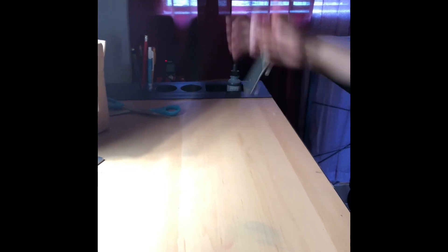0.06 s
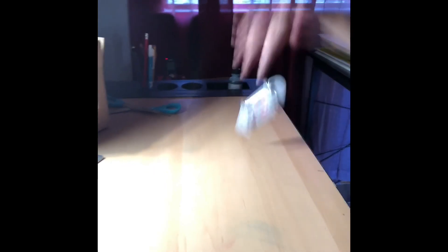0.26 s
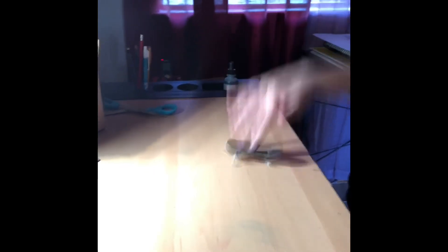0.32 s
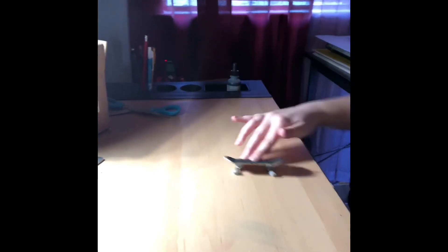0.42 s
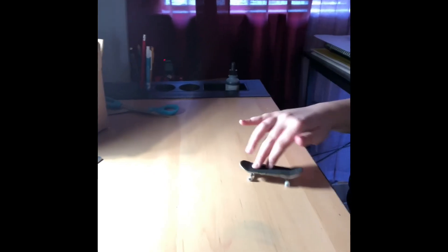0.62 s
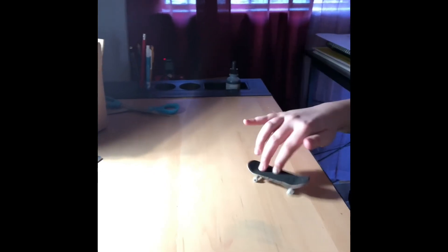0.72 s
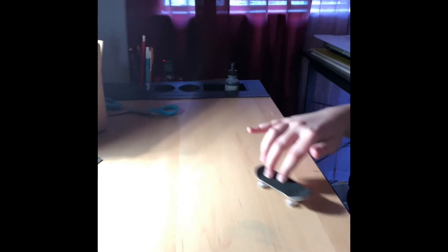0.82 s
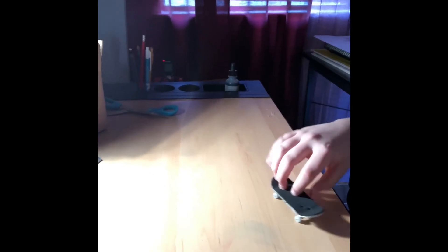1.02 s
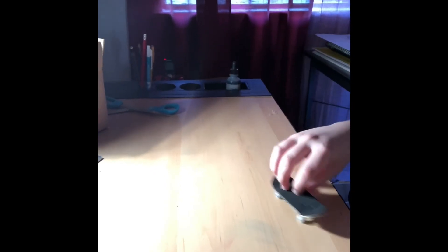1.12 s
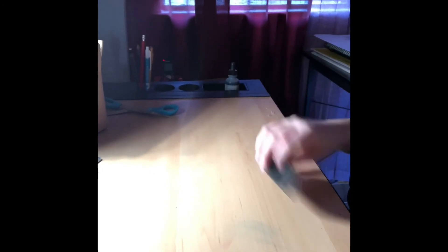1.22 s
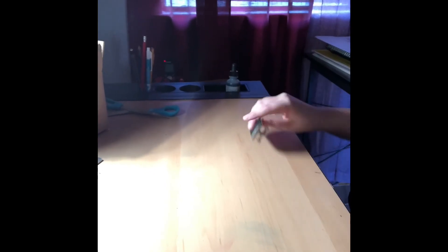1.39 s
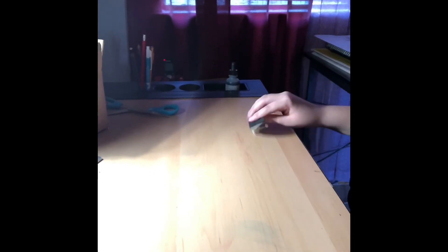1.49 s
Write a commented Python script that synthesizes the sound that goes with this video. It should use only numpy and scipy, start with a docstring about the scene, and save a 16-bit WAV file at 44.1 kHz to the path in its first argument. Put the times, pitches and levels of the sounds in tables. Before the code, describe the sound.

A toy finger skateboard on a wooden counter: the ringing tail of a flick fades at 0 s, then a loud, bright cluster of clacks and wheel rattle at 0.24-0.3 s, with short room reverb. Faint uneven rolling, scuffs and ticks follow from 0.4 to 1.13 s, then near quiet with low hum. Lighter clicks come at 1.4 s and a sharper clack at 1.52 s.

```python
"""Over room air and a low appliance hum, the flick of a toy skateboard off a wooden counter dies away.
The board clatters down wheels first, its loose wheels rattling, then rolls under two fingers,
is picked up and is set down again. Each contact is a noise burst that excites the modes of deck
and counter; rolling is a dense train of small bumps through resonances; a hard-walled kitchen
answers every contact and the rolling with a diffuse decay."""
import sys
import numpy as np
from scipy import signal
from scipy.fft import rfft, irfft
from scipy.io import wavfile

SR = 44100
rng = np.random.default_rng(int(sys.argv[2]) if len(sys.argv) > 2 else 0)


def volts(x):
    """Linear amplitude factor 10**(x/20) for a level x in dB, scalar or array-like."""
    e = np.asarray(x, float) / 20
    return 10 ** e


def persist_wave(psi):
    """Save psi, clipped to +-1, as 16-bit WAV."""
    counts = np.round(np.clip(psi, -1, 1) * 32767).astype(np.int16)
    wavfile.write(sys.argv[1], SR, np.atleast_2d(counts).T)


N = 68355
LEAD = int(.25 * SR)   # samples computed before t = 0, so that earlier sounds can ring on
M = N + LEAD


def rms_one(x):
    """Normalisation: scales a signal to unit rms."""
    return x / np.sqrt(np.mean(x ** 2) + 1e-20)


def resonance(x, hz, width_hz):
    """Damped oscillator: a two-pole band-pass with gain 1 near its peak."""
    r = np.exp(-np.pi * width_hz / SR)
    angle = 2 * np.pi * min(hz, .45 * SR) / SR
    return signal.lfilter(np.array([1, 0, -1]) * (1 - r * r) / 2, [1, -2 * r * np.cos(angle), r * r], x)


def double_resonance(x, hz, width_hz):
    """Cascade: two equal resonators in series give steeper skirts."""
    return resonance(resonance(x, hz, width_hz), hz, width_hz)


# Spectral density of the room air: f/Hz, relative level/dB per Hz
AIR = [(18, -41), (30, -13.5), (127, -3), (486, -13), (760, -20), (1630, -26.5), (2010, -25.5),
       (4080, -28.5), (4650, -28), (12600, -33.5), (16000, -44)]
# Bands of the appliance hum: f/Hz, width of each resonator/Hz, rms level/dB
HUM = [(53.54, 7.1, -81.5), (93.4, 5.5, -71), (120.9, 5.6, -67), (237.6, 3, -68.5)]
AIR_DB = -64   # rms


def background():
    """Filtered noise: shaped air, and narrow bands whose random beating makes the hum waver."""
    hz, db = np.transpose(AIR)
    log_f = np.log(np.fft.rfftfreq(M, 1 / SR) + 1)
    spectrum = rfft(rng.standard_normal(M)) * volts(np.interp(log_f, np.log(hz), db))
    air = irfft(spectrum, M)
    hum = 0
    for band_hz, width_hz, band_db in HUM:
        hum = hum + volts(band_db) * rms_one(double_resonance(rng.standard_normal(M), band_hz, width_hz))
    return volts(AIR_DB) * rms_one(air) + hum


def bursts(times, levels_db, rise_s, t60, colour):
    """Impact excitation: a sharp first contact in dying chatter, each coloured by its own filter."""
    size = 8000
    out, t = np.zeros(M + size), np.arange(size) / SR
    for k, noise in enumerate(rng.standard_normal((len(times), size))):
        burst = noise * np.minimum(t / rise_s, 1) * volts(-60 * t / t60)
        burst[int(rise_s * SR)] = volts(13)   # first contact, dB re the rms of the undecayed chatter
        burst = colour(burst, k)
        i = int(times[k] * SR) + LEAD
        out[i:i + size] += volts(levels_db[k]) * burst / np.abs(burst).max()
    return out[:M]


def cracks(s, db, hz, snap_db, t60, q):
    """Contact spectrum: each burst is coloured around its centre, with a broad bright snap."""
    def colour(x, k):
        body = double_resonance(x, hz[k], hz[k] / q)
        snap = resonance(x, 12000, 12000)
        return body + volts(snap_db[k]) * snap
    return bursts(s, db, .00022, t60, colour)   # rise/s


def rings(x, modes):
    """Modal superposition: all modes of a body are driven by the same blows, in alternating sign."""
    out = 0
    for k, (hz, db, t60) in enumerate(modes):
        width_hz = np.log(1000) / np.pi / t60
        out = out + volts(db) * (-1) ** k * resonance(x, hz, width_hz)
    return out


# The flick, before t = 0: time before zero t/s, crack peak level/dB, crack centre f/Hz,
# snap gain/dB, knock level/dB re KNOCK_DB
FLICK = [(0.015, -19.5, 2900, -11.5, -18), (0.033, -14.5, 2800, -14.5, -25.5),
         (.016, -16.5, 2700, -17.5, -24.5), (0.0066, -17, 6400, -14, -21.5)]
# Later contacts: t/s, crack peak level/dB, crack centre f/Hz, snap gain/dB, knock level/dB re KNOCK_DB
CLACKS = [(.2379, -2.5, 4330, -15.5, -17.5), (.2387, -8, 3600, -8, -21.5), (.2408, -11.5, 2130, -18, -23.5),
          (.2487, -18, 4100, -12, -23.5), (.2593, -7, 5500, -8, -26), (.2638, 0.5, 6140, -4.5, -30),
          (.2646, -9, 11600, -19, -48), (.2664, -11.5, 4800, -15, -50), (.272, -7.5, 5500, -7, -49),
          (.276, -16.5, 6730, -12, -23.5), (.2817, -0.5, 3970, -5, -27), (.2832, -8.5, 2600, -40, -13),
          (.2883, -1.5, 5300, -28, -33.5), (.2915, -22, 3500, 5, -23), (.2946, -3.5, 6760, -2, -21),
          (.2985, -25, 5500, -5, -23.5), (.397, -26, 3600, -17, -36), (.6138, -38.5, 5500, -14, -55),
          (.6162, -32.5, 1653, -28.5, -71), (1.4043, -27, 4100, -18, -62.5),
          (1.4056, -23.5, 7930, -11.5, -59), (1.4062, -34, 2300, -27, -41),
          (1.4163, -19.5, 6000, -22, -48.5), (1.4172, -21.5, 6950, -9, -47), (1.4192, -25, 2400, -21, -46),
          (1.4225, -30.5, 1860, -20.5, -62), (1.5221, -11, 6850, 1, -37), (1.5242, -20, 1890, -18, -58),
          (1.5248, -21, 3600, -10, -44), (1.5295, -35.5, 4050, -10, -39)]
# Modes of deck and trucks: f/Hz, level/dB re RING_DB, t60/s
DECK = [(1625, 3.5, 0.013), (2400, 1, 0.06), (2636, -8, 0.023), (3600, 4, 0.0067), (4690, -7, 0.011),
        (5320, 4, 0.06), (6450, -12.5, 0.018), (7075, 2, 0.039), (10150, -12, 0.036), (11000, -11.5, .01),
        (11600, -12, 0.0089), (13700, -11.5, 0.0077)]
# Modes of the counter top, also shaken by thumps(): f/Hz, relative level/dB, t60/s
COUNTER = [(126.7, -10.5, 0.2), (169.7, -9.5, 0.056), (247.2, -2, 0.087), (282.4, -3, 0.023),
           (421, -3.5, 0.07), (484.7, -3, 0.057), (619, 1.5, 0.078), (708.4, -3, 0.046), (800, -7, 0.017),
           (988, -7, 0.037), (1273, -7.5, 0.01)]
RING_DB, KNOCK_DB = 2, 13   # gains of the deck's and the knocked counter's ringing


def clacks():
    """Impulsive excitation of coupled bodies: each contact cracks, rings the deck, knocks the counter."""
    flick = [[-early_s, *rest] for early_s, *rest in FLICK]
    s, db, hz, snap_db, knock_db = np.transpose(list(CLACKS) + flick)
    crack = cracks(s, db, hz, snap_db, t60=0.011, q=1.214)
    knock = bursts(s, knock_db, .0008, 0.023, lambda x, k: resonance(x, 330, 1300))   # rise/s, t60/s
    return crack + volts(RING_DB) * rings(crack, DECK) + volts(KNOCK_DB) * rings(knock, COUNTER)


# Room decay by band: f/Hz, relative level/dB, t60 of the tail/s
ROOM = [(129.2, -12.5, 0.72), (272, -10, 0.98), (530, -13, .5), (1030, -8, 0.51), (2003, -7.5, 0.49),
        (3500, -12, .55), (6000, -13.5, .5), (10000, -12, 0.3), (15000, -17, 0.56)]
BUILD_UP_S = 0.006   # the reply grows linearly from half to one and a half times this delay
EARLY_DB, EARLY_T60_S = 5, 0.089   # early part re tail


def room(x):
    """Diffuse reverberation: a strong early part, then a tail decaying exponentially band by band."""
    size = int(.7 * SR)
    t = np.arange(size) / SR
    log_f = np.log(np.fft.rfftfreq(size, 1 / SR) + 1)
    white = rfft(rng.standard_normal(size))
    centres = np.log([row[0] for row in ROOM])
    reply = 0
    for k, (_, db, t60) in enumerate(ROOM):
        share = np.interp(log_f, centres, np.arange(len(ROOM)) == k)   # triangular band on log f
        band = irfft(white * share, size)
        decay = volts(-60 * t / t60) + volts(EARLY_DB - 60 * t / EARLY_T60_S)
        reply = reply + band * volts(db) * decay
    reply = reply * np.clip(t / BUILD_UP_S - .5, 0, 1) / np.sqrt(.03 * SR)
    return signal.fftconvolve(x, reply)[:M]


# Weight of hand and board on the counter: t/s (the push starts 4 ms sooner), push peak level/dB
THUMPS = [(.001, -28), (0.243, -38), (.288, -32.5)]


def thumps():
    """Low-frequency forcing: soft pushes move the counter and drive its modes, the lowest most."""
    s, db = np.transpose(THUMPS)
    push = bursts(s - .004, db, 0.003, 0.083, lambda x, k: double_resonance(x, 110, 190))   # rise/s, t60/s
    return push + volts(6.5) * rings(push, COUNTER)


# Ticks of axles and fingers: t/s, peak level/dB, centre f/Hz
TICKS = [(0.204, -47.5, 4170), (0.2144, -45, 4650), (.642, -59, 6500), (.699, -45.5, 10000),
         (0.703, -48, 6000), (0.7227, -41.5, 3600), (.7365, -41, 3500), (.7475, -48, 5500),
         (0.7555, -45, 6000), (.758, -64, 11500), (.7615, -46, 9100), (.7655, -38, 4250),
         (0.777, -42, 5460), (0.879, -43.5, 3930), (.9425, -61, 5500), (.979, -51, 5400),
         (1.0434, -49.5, 6000), (1.0535, -48, 10320), (1.074, -47, 11300), (1.111, -45, 1900),
         (1.113, -33.5, 3360), (1.117, -38, 3000), (1.122, -40, 3600), (1.17, -54.5, 12000),
         (0.506, -35.5, 13000), (.527, -57, 11840), (1.232, -51, 10000), (1.204, -55, 6060),
         (1.373, -60, 10600), (1.381, -48.5, 10300)]


def ticks():
    """Light impact: small contacts of axles and fingers radiate a crack without exciting the modes."""
    s, db, hz = np.transpose(TICKS)
    return cracks(s, db, hz, np.full(len(s), -12.5), t60=0.019, q=0.64)


BUMPS_PER_S, BUMP_SPREAD_DB = 3300, 3   # mean rate; scale of the exponential spread in level
WOBBLE_DB, WOBBLE_HZ = 3.5, 37   # rms swing of each resonance's level; corner of each smoothing pole


def bumps(resonances):
    """Random impact train: dense uneven bumps through resonances of wobbling level; rms 1."""
    out = 0
    r = np.exp(-2 * np.pi * WOBBLE_HZ / SR)
    for hz, width_hz, db in resonances:
        hit = rng.random(M) < BUMPS_PER_S / SR
        sign = rng.choice([-1, 1], M)
        grain = hit * sign * volts(BUMP_SPREAD_DB * np.minimum(rng.exponential(1, M), 3))
        wobble = rms_one(signal.lfilter([1], [1, -2 * r, r * r], rng.standard_normal(M)))
        ringing = resonance(resonance(grain, hz, 2 * width_hz), hz, width_hz)
        out = out + volts(db + WOBBLE_DB * wobble) * rms_one(ringing)
    return rms_one(out)


# Loose wheels rattling while the board tumbles: t/s, level/dB
RATTLE = [(.259, -57.5), (.262, -30), (.268, -23), (.28, -26), (0.299, -27.5), (.31, -42), (.33, -72.5)]
# Resonances of the rattle: f/Hz, width of the narrower of two resonators/Hz, relative level/dB
RATTLE_RING = [(2600, 900, 2), (4700, 2000, -5), (7200, 3800, -5), (11500, 4000, -4), (14800, 4000, -8)]


def rattle():
    """Repeated micro-impacts: loose wheels chatter brightly and densely on their axles."""
    s, db = np.transpose(RATTLE)
    t = (np.arange(M) - LEAD) / SR
    return volts(np.interp(t, s, db, -120, -120)) * bumps(RATTLE_RING)


# Wheels and fingers moving on the board, one list for each spell of movement:
# t/s, body level/dB, grit level/dB re body, weight on the counter level/dB re body
ROLL = [
    [(0.43, -53, -14, -4), (0.47, -59, -21, -4), (0.504, -45, -6.5, 2), (0.592, -52.5, -18, -7.5),
     (0.618, -44, -24, -16), (0.626, -56, -8, -5.5), (0.646, -51, -17, -6), (0.662, -57, -5, -3),
     (0.678, -44.5, -16.5, -12), (0.702, -51.5, -2, 0), (0.712, -45.5, -19, -10), (0.732, -53, -14, -1),
     (0.74, -43.5, -14, -9), (0.772, -53, -6, 1), (0.838, -49, -6.5, 2), (0.958, -63, -7, 2.5),
     (0.986, -57.5, -1, 6), (1.026, -68, -23.5, 0), (1.042, -63.5, 3, -11), (1.058, -55.5, -4.5, -10),
     (1.094, -52.5, -6, -8.5), (1.114, -40, -11.5, -11), (1.134, -59.5, -22, 3.5), (1.2, -75, 3, -12),
     (1.3, -84.5, -2, 11), (1.39, -83, 10.5, -1.5)],
    [(1.43, -42, -6, -21), (1.436, -53.5, -8.5, 7), (1.484, -46, -7, -5.5), (1.5, -64, -1, 5),
     (1.512, -44.5, -11.5, -5)],
]
# Resonances of the deck body, of the grit and of the weight on the counter:
# f/Hz, width of the narrower of two resonators/Hz, relative level/dB
ROLL_BODY = [(1372, 216, -8), (1544, 200, -3.5), (1745, 236, -3), (1960, 180, -4.5), (2328, 296, -3.5),
             (2903, 340, -5.5), (3378, 270, -4.5), (3990, 360, -7.5)]
ROLL_GRIT = [(5500, 1100, 2), (7400, 980, -9), (10670, 1200, -9.5), (13000, 1300, -13.5)]
ROLL_WEIGHT = [(471, 210, -3.5), (601.6, 64, -2.5), (728, 180, -6), (896, 157, -1), (1148, 290, -1)]
ROLL_IN_S = 0.014   # fade-in, complete at the first row of each spell


def rolling():
    """Roughness excitation: wood grain under the wheels drives deck body, grit and counter."""
    t, out = (np.arange(M) - LEAD) / SR, 0
    body, grit, weight = bumps(ROLL_BODY), bumps(ROLL_GRIT), bumps(ROLL_WEIGHT)
    for rows, stop_s in zip(ROLL, (1.4, 1.6)):
        s, db, grit_db, weight_db = np.transpose(rows)
        moving = np.clip((t - s[0]) / ROLL_IN_S + 1, 0, 1) * (t < stop_s)
        level, grit_gain, weight_gain = [volts(np.interp(t, s, c)) for c in (db, grit_db, weight_db)]
        out = out + moving * level * (body + grit_gain * grit + weight_gain * weight)
    return out


def scene():
    """Linear superposition: direct sound, the room's reply and the background add up."""
    hits = clacks() + thumps() + ticks() + rattle()
    roll = rolling()
    reply = room(hits + volts(-2) * roll)   # rolling excites the room 2 dB less
    mix = hits + roll + reply + background()
    return mix[None, LEAD:]


def top_cut(x):
    """Nothing passes above the cut-off."""
    return signal.sosfilt(signal.butter(12, 16870, fs=SR, output="sos"), x)


def record(dry):
    """Band limitation: a steep low-pass holds everything above 16.8 kHz at least 55 dB down."""
    low_pass = signal.cheby2(16, 55, 16800, fs=SR, output="sos")
    mix = signal.sosfilt(low_pass, dry)
    return top_cut(mix)


dry = scene()
out = record(dry)
persist_wave(out)
```